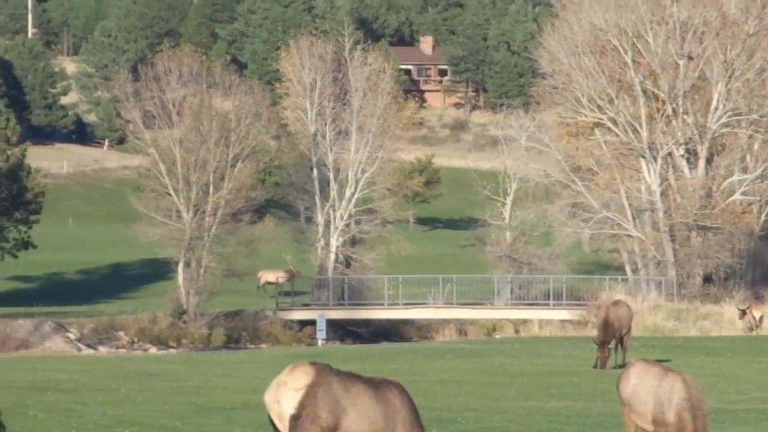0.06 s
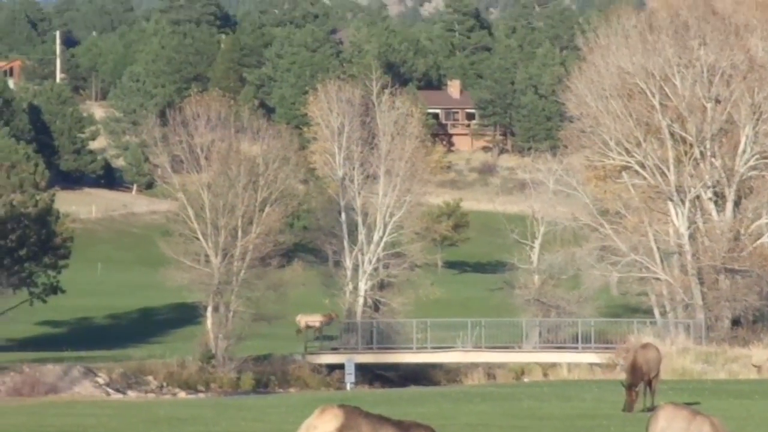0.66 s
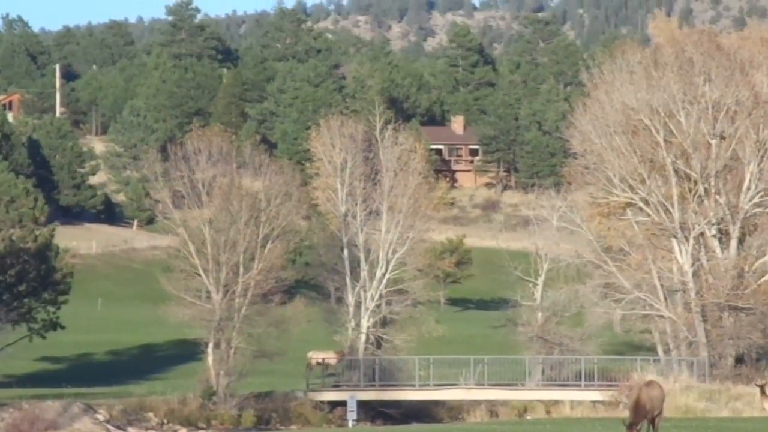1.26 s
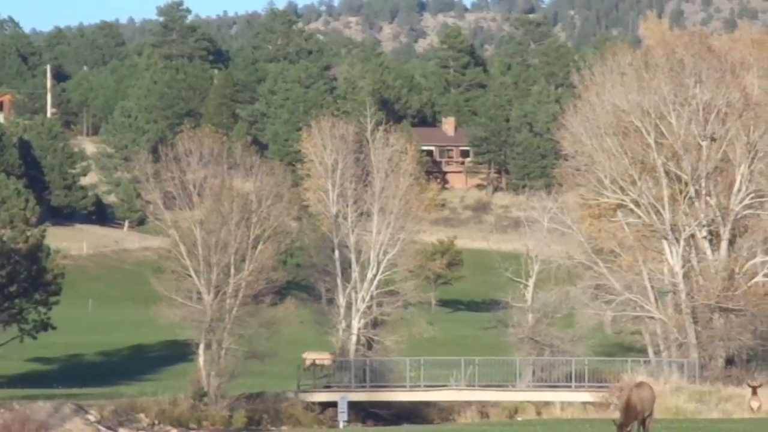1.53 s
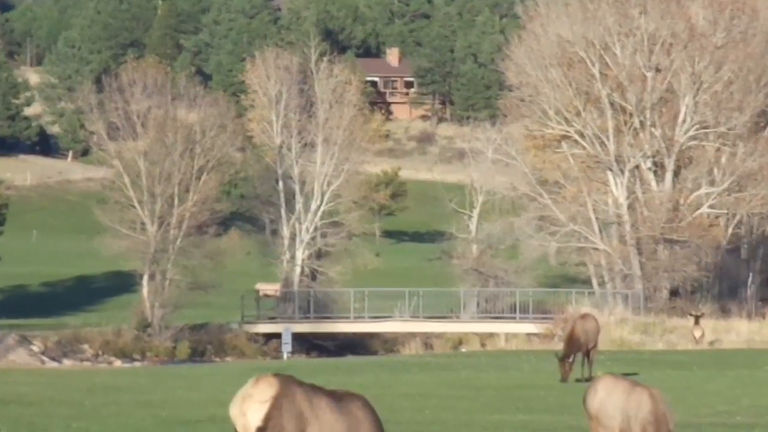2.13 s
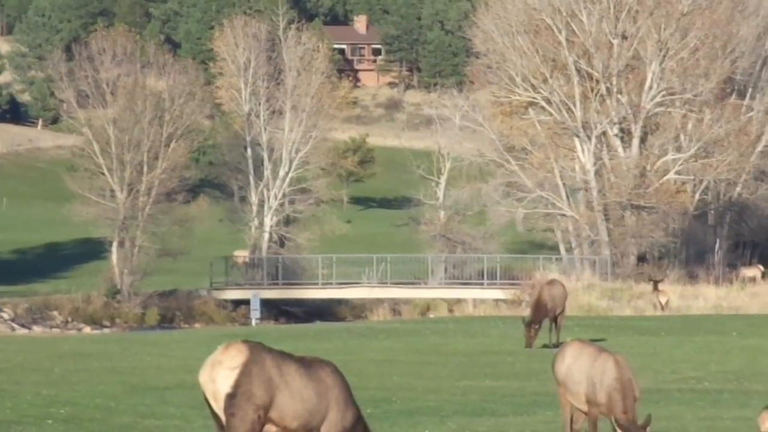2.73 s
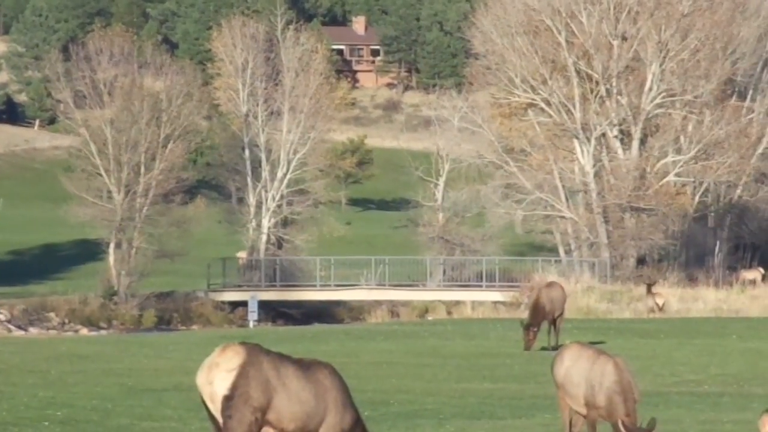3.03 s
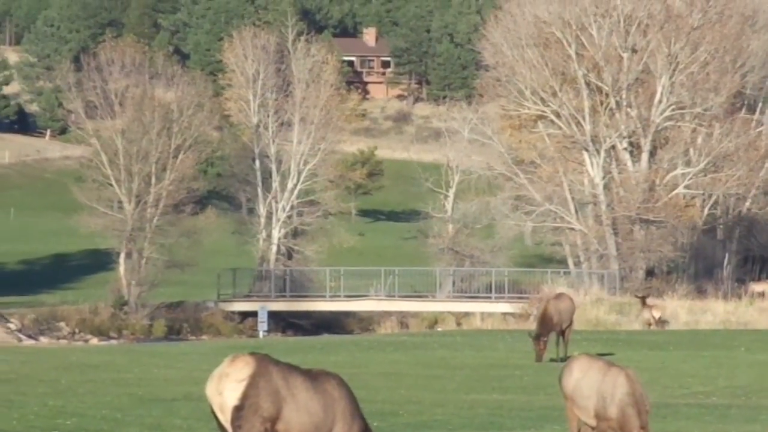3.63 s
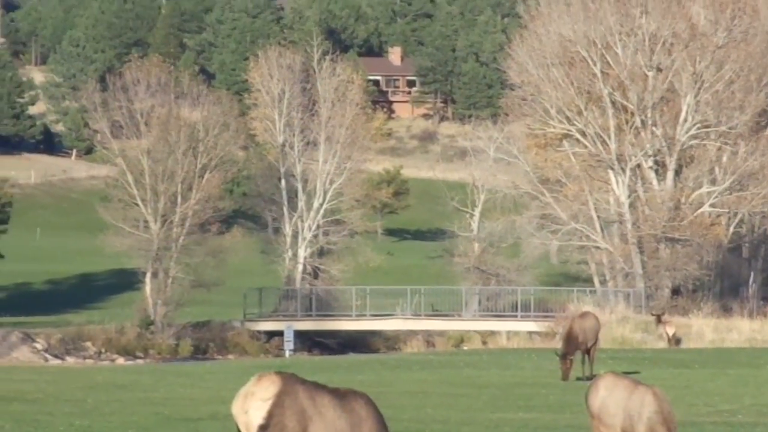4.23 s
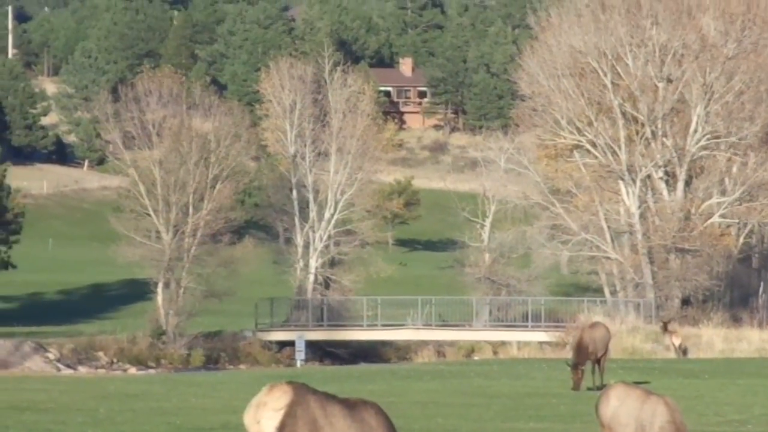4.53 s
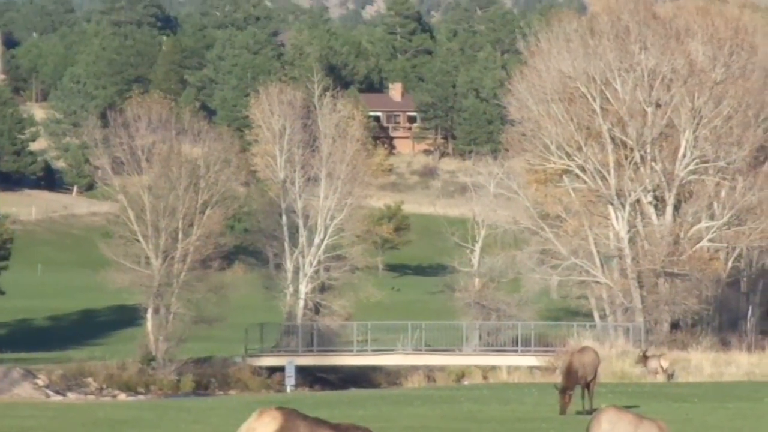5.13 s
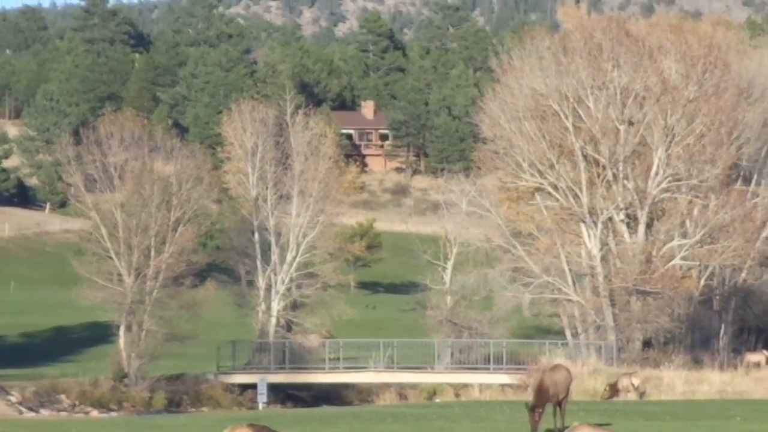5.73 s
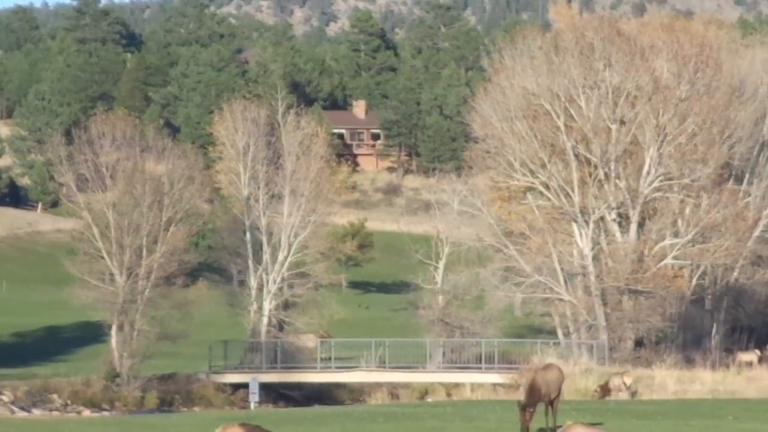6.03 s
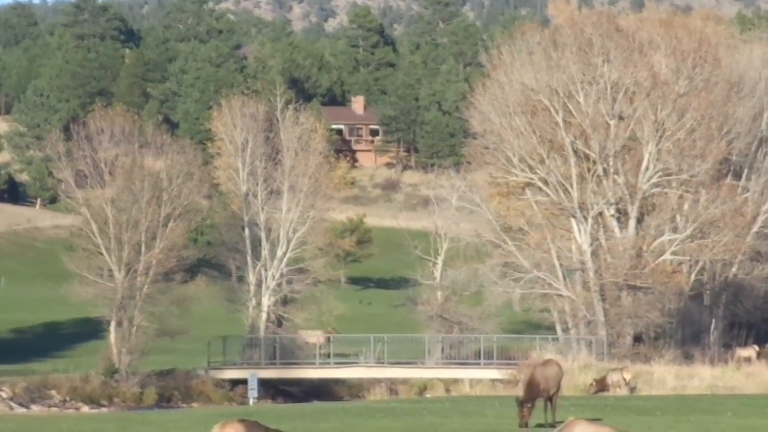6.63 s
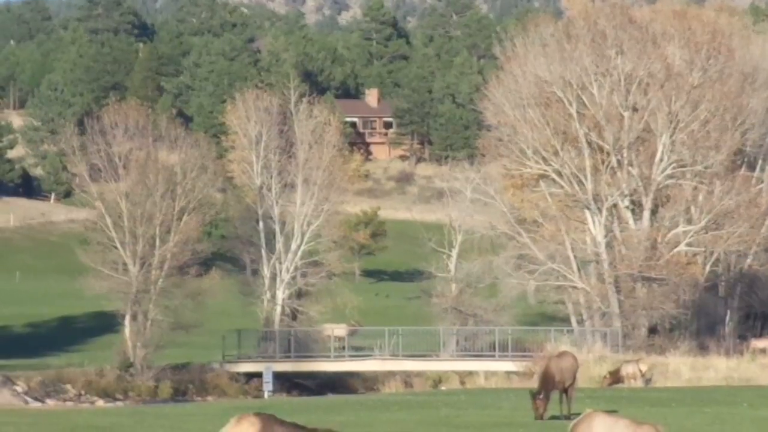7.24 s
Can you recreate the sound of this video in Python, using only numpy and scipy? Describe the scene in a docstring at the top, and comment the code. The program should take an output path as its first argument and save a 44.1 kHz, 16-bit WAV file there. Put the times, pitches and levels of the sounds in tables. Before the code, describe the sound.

Gusty wind blows across the bare microphone of a hand-held camera in an open meadow, making a close, fluttering rumble with dull thumps. The hardest gusts overload it with brief cracks and fizz. A short lull near the middle reveals a faint valley rush, distant birds and a light finger rub. Then the strongest gusts hit, followed by weaker ones to the end.

```python
"""An open meadow, gusty wind on the bare microphone of a hand-held camera, a valley rushing far off.
From the start eddies sweep the port in a fluttering rumble that rises in pitch with the wind speed;
strong ones thump, and from 0.7 s the hardest overload the microphone, crack and fizz. Dull low thumps,
mostly from large slow eddies, first come at 2.4 s. A lull near 3 s bares distant birds, a finger rub and
the camera's hiss. Hard gusts crack again from 3.6 s to 4.9 s, then weaker ones blow on to the end."""
import sys
import numpy as np
from scipy import signal
from scipy.fft import rfft, irfft
from scipy.io import wavfile
from scipy.ndimage import uniform_filter1d, map_coordinates

SR = 44100
rng = np.random.default_rng(int(sys.argv[2]) if len(sys.argv) > 2 else 0)


def wrap_up_sound(samples):
    """Save the sound to the file named by the first command line argument, as 16-bit audio."""
    columns = np.atleast_2d(samples).T
    # keep every value between -1 and 1, then stretch to whole-number steps
    tamed = np.clip(columns, -1, 1)
    steps = np.round(tamed * 32767).astype(np.int16)
    wavfile.write(sys.argv[1], SR, steps)


N = 325458
TIME = np.arange(N) / SR
REFERENCE_DB, REFERENCE_HZ = -30, 350.9   # wind level and nominal eddy pitch that give speed 1

# far rush of the valley: (frequency [Hz], spectral level [dB])
VALLEY_SPECTRUM = [(20, 7), (100, -10), (250, -18.5), (450, -3.5), (700, 3.5), (930, 6), (1300, -4),
                   (1650, -7), (2100, -15), (3200, -22.5), (6000, -30.5), (15000, -46.5)]
# gusts reaching the microphone port: (start [s], length [s], wind level [dB])
GUSTS = [(0.015, .2, -32.5), (0.26, 0.27, -37.5), (0.523, 0.27, -27.5), (0.844, .03, -28),
         (0.992, 0.079, -29), (1.089, 0.068, -32), (1.213, .16, -28), (1.411, 0.12, -45),
         (1.619, 0.092, -48), (1.82, 0.064, -37), (1.919, 0.29, -27.5), (2.251, .055, -29),
         (2.357, 0.041, -24), (2.448, 0.099, -28), (2.643, 0.095, -29), (2.775, .23, -29.5),
         (3.015, 0.14, -51.5), (3.553, 0.18, -26), (3.783, .255, -35), (4.074, .185, -30.5),
         (4.323, 0.13, -24), (4.458, .3, -42.5), (4.796, 0.21, -35), (5.091, 0.036, -30),
         (5.163, .2, -42.5), (5.378, 0.24, -30.5), (5.66, 0.22, -32), (5.904, 0.51, -42), (6.61, 0.1, -37),
         (6.781, 0.47, -35.5), (7.276, 0.19, -45)]
# pressure of the large eddies at speed 1: (frequency [Hz], spectral level [dB])
LARGE_EDDY_SPECTRUM = [(20, -22.5), (60, -17), (130, -2.5), (260, 3.5), (420, 1), (600, -4), (800, -22.5),
                       (1200, -41.5)]
# pressure of the fine eddies at speed 1: (frequency [Hz], spectral level [dB])
FINE_EDDY_SPECTRUM = [(350, -35.5), (550, -4.5), (720, 4.5), (950, -6), (1350, -22), (1900, -40),
                      (2600, -41), (4500, -70.5)]
# single strong eddies: (time [s], relative level [dB], nominal pitch [Hz], nominal length [s])
BUFFETS = [(0.1, -24.5, 359.2, 0.023), (0.171, -19.5, 377.7, 0.01), (0.252, -21.5, 369, 0.0091),
           (0.544, -18, 392.1, 0.015), (0.571, -18.5, 400.5, 0.0071), (0.638, -17, 357.6, 0.004),
           (0.691, -18, 519, 0.012), (0.707, -12.5, 488.5, 0.01), (0.724, -17.5, 805.5, 0.0084),
           (0.758, -15.5, 418, 0.019), (0.783, -15.5, 342, 0.0038), (0.843, -17.5, 504, 0.0076),
           (0.918, -20, 559.7, 0.0023), (0.944, -23.5, 555.8, 0.024), (1.02, -17, 462.4, 0.013),
           (1.038, -18, 418.6, 0.0053), (1.099, -18, 392.2, 0.0081), (1.261, -16.5, 373.5, .01),
           (1.328, -12.5, 537, 0.019), (1.348, -14, 507, 0.0092), (1.361, -12.5, 547, 0.0053),
           (1.372, -14.5, 449, 0.0082), (1.468, -23, 249, 0.011), (1.589, -26, 410.5, 0.0095),
           (1.917, -16.5, 390.4, 0.011), (1.967, -15.5, 487.4, 0.0048), (1.985, -16, 458.5, 0.0082),
           (2.012, -17.5, 391.7, 0.0063), (2.103, -15, 484, 0.0068), (2.12, -14.5, 323, 0.0078),
           (2.149, -14, 322.1, 0.0038), (2.279, -15, 330.5, 0.0091), (2.357, -14.5, 239, 0.008),
           (2.386, -12.5, 478, 0.0082), (2.477, -11.5, 488.2, 0.011), (2.495, -15.5, 451.8, 0.016),
           (2.534, -15.5, 470.3, 0.0024), (2.611, -14, 469.5, 0.0081), (2.656, -15, 470, 0.0096),
           (2.715, -17, 422, 0.0074), (2.856, -16, 321, 0.0066), (2.874, -17, 418.4, 0.0059),
           (2.907, -13.5, 589.7, 0.0065), (2.936, -14.5, 368.4, 0.0099), (2.96, -16.5, 385.3, 0.0084),
           (3.555, -17, 280.4, 0.0049), (3.571, -11.5, 388.2, 0.0058), (3.602, -12.5, 630.4, 0.0086),
           (3.65, -16, 641, 0.018), (3.668, -12.5, 550.5, .014), (3.686, -12.5, 528.2, .011),
           (3.705, -13.5, 519.9, 0.02), (3.765, -6.5, 394, 0.0046), (3.87, -23, 600.6, 0.0061),
           (3.898, -22, 451, 0.009), (3.965, -16.5, 488.4, 0.0052), (4.011, -20, 499.2, 0.0088),
           (4.027, -19.5, 464.4, 0.0093), (4.082, -14.5, 488.7, 0.018), (4.108, -10, 340.7, 0.0098),
           (4.126, -7, 533, 0.0033), (4.149, -21.5, 450.7, 0.013), (4.225, -19, 402.2, 0.017),
           (4.329, -12.5, 359.3, 0.0059), (4.342, -10, 561, 0.0066), (4.356, -11, 476.3, 0.0094),
           (4.368, -13, 539.3, 0.0086), (4.437, -30, 303.3, 0.0054), (4.552, -21.5, 305.4, 0.017),
           (4.633, -26, 290.4, 0.0061), (4.804, -23, 348, 0.006), (4.837, -22, 398, 0.012),
           (4.905, -15, 501.2, 0.0048), (5.112, -14.5, 530.3, 0.0065), (5.132, -16, 369.5, 0.0064),
           (5.267, -21.5, 249.8, 0.0055), (5.315, -19.5, 377.9, .005), (5.541, -18.5, 278.9, .007),
           (5.587, -14, 259.7, 0.0069), (5.642, -17, 341.7, 0.0058), (5.707, -19, 349.8, .005),
           (5.89, -23, 379.3, 0.0064), (6.127, -25, 270.3, 0.0081), (6.182, -27, 241, 0.0092),
           (6.272, -28.5, 271.6, 0.0085), (6.398, -33.5, 251.8, 0.0052), (6.614, -20, 290, 0.0072),
           (6.701, -23.5, 450, 0.0052), (6.753, -19.5, 240.2, .005), (6.776, -16, 289.4, 0.0064),
           (6.808, -18.5, 396.3, .011), (6.862, -16, 492.1, .008), (6.948, -20.5, 430.6, 0.0094),
           (6.987, -17, 471.8, 0.0052), (7.055, -22, 431, 0.011), (7.13, -21, 439.2, 0.0049),
           (7.211, -19.5, 430, .006)]
# diaphragm cracks in the hardest gusts: (time [s], relative peak [dB], treble cutoff [Hz])
CRACKS = [(0.7062, -30, 1500), (0.7179, -9.5, 1680), (0.7576, -40, 3000), (1.3265, -29, 1440),
          (1.3491, -34.5, 4406), (1.36, -28, 2903), (2.1469, -25, 1530), (2.3567, -30.5, 1500),
          (2.3694, -26, 3250), (2.477, -33, 2900), (2.9082, -36, 1600), (3.5701, -25.5, 1496),
          (3.6056, -17, 9670), (3.664, -20, 1500), (3.6714, -12.5, 1500), (3.698, -16, 1500),
          (3.7041, -24, 2900), (3.7634, -18, 11880), (4.1083, -18.5, 10980), (4.1224, -13.5, 1751),
          (4.1881, -41, 7300), (4.2199, -31.5, 6797), (4.2527, -34, 6450), (4.3279, -23, 2480),
          (4.3463, -14, 1506), (4.3556, -24, 3000), (4.3877, -41, 6300), (4.4193, -38, 7260),
          (4.9035, -19, 1700)]
# gritty fizz of the overloaded microphone: (time [s], level [dB], width [s])
FIZZES = [(0.734, -64, 0.026), (1.355, -68, 0.02), (2.367, -68, 0.011), (3.69, -56, 0.016),
          (4.198, -67, 0.035), (4.358, -59.5, .018)]
# dull low thumps, mostly from large slow wind eddies: (time [s], level [dB])
THUMPS = [(2.367, -24), (2.608, -30.5), (3.144, -38), (4.392, -23), (4.434, -17.5), (4.539, -27),
          (6.007, -31), (6.058, -32.5), (6.175, -27.5)]
# tone of a low thump: (frequency [Hz], spectral level [dB])
THUMP_SPECTRUM = [(30, -19), (90, 3.5), (150, 17), (230, -14.5), (400, -17), (900, -62)]
# birds far across the meadow: (time [s], level [dB], pitch [Hz], width [s])
BIRD_CALLS = [(2.974, -59, 1641, 0.028), (3.061, -70, 2353, 0.017), (5.33, -62.5, 1852, 0.029)]
# fingers shifting on the camera body: (time [s], level [dB], width [s])
RUBS = [(3.278, -66, 0.0045), (4.484, -64.5, .012), (5.189, -69.5, 0.0065)]
# tone of a finger rub: (frequency [Hz], spectral level [dB])
RUB_SPECTRUM = [(1500, -4), (3000, 2), (6500, -5), (9000, -8), (15000, -25)]


def from_db(db):
    """Decibels to gain."""
    return 10 ** (np.asarray(db) / 20)


def rms_one(x):
    """Scale to unit power."""
    return x / np.sqrt(np.mean(x ** 2) + 1e-20)


def smooth(x, seconds):
    """Triangular moving average."""
    size = max(int(seconds * SR), 1)
    return uniform_filter1d(uniform_filter1d(x, size), size)


def evened(x, seconds):
    """Hold the power near one over the given time."""
    return x / np.sqrt(np.abs(smooth(x ** 2, seconds)) + 1e-6)


def drift(rate):
    """Random wander of spread 1 that changes about rate times a second."""
    return rms_one(smooth(rng.standard_normal(2 * N), .5 / rate)[N // 2:N // 2 + N])


def noise(spectrum, size=N):
    """Noise of unit power with the given spectrum."""
    hz, level_db = np.transpose(spectrum)
    bin_hz = np.maximum(np.arange(size // 2 + 1) * SR / size, 1)
    gain = from_db(np.interp(np.log(bin_hz), np.log(hz), level_db, right=-200))
    return rms_one(irfft(rfft(rng.standard_normal(size)) * gain, size))


def butter(x, hz, kind):
    """Causal second-order low- or high-pass."""
    return signal.sosfilt(signal.butter(2, hz, kind, fs=SR, output="sos"), x)


def bell(at, width):
    """Gaussian swell of height 1; width is its standard deviation in seconds."""
    out = np.zeros(N)
    near = slice(max(int((at - 5 * width) * SR), 0), int((at + 5 * width) * SR))
    out[near] = np.exp(-.5 * ((TIME[near] - at) / width) ** 2)
    return out


def valley_rush(level_db=-55, waver_db=1.02):
    """The valley rushes in the distance, its level wavering slightly."""
    return from_db(level_db + waver_db * drift(4.6)) * noise(VALLEY_SPECTRUM)


def camera_noise(hiss_db=-71, whine_db=-88.5, whine_hz=12265):
    """The camera's own white hiss and faint, unsteady whine."""
    whine = np.sin(2 * np.pi * np.cumsum(whine_hz + 15 * drift(20)) / SR)
    return from_db(hiss_db) * rng.standard_normal(N) + from_db(whine_db) * whine


def wind_level(calm_db=-61, rise_db_per_s=1101, sag_db_per_s=9, fall_db_per_s=1001.5):
    """Wind at the port in dB: each gust rises, sags and collapses; the strongest prevails."""
    wind_db = np.full(N, float(calm_db))
    for start, length, db in GUSTS:
        age = TIME - start
        early, late = np.maximum(-age, 0), np.maximum(age - length, 0)
        gust_db = db - rise_db_per_s * early - sag_db_per_s * age - fall_db_per_s * late
        wind_db = np.maximum(wind_db, gust_db)
    return wind_db


def rumble(wind_db, level_db=-47, follow=0.49, bottom_hz=36, top_hz=120):
    """Large slow eddies around the camera body follow the gusts only loosely."""
    bass = butter(butter(rng.standard_normal(N), top_hz, "low"), bottom_hz, "high")
    swell_db = follow * (smooth(wind_db, 0.083) - REFERENCE_DB)
    return from_db(level_db + swell_db) * rms_one(bass)


def swept_eddies(speed, fine_db, even_s):
    """A frozen pattern of eddies is carried past the port: the faster, the higher it sounds."""
    travelled = np.cumsum(np.clip(speed, .2, 2.5))
    large, fine = (map_coordinates(noise(spectrum, size=2 * N), [travelled], order=3, mode="wrap")
                   for spectrum in (LARGE_EDDY_SPECTRUM, FINE_EDDY_SPECTRUM))
    return evened(large, even_s) + from_db(fine_db) * speed * evened(fine, even_s)


def shedding(wind_db, eddies_per_s=34, jitter=.8):
    """In weak wind the housing sheds eddies one by one, unevenly; a level swing in dB."""
    rate = eddies_per_s * np.exp(jitter * drift(70))
    swing_db = np.clip(1 + .3 * (REFERENCE_DB - wind_db), 0, 6)
    return swing_db * np.sin(2 * np.pi * np.cumsum(rate) / SR)


def slack(lead_s=0.01238, width_s=.005, drop_db=7):
    """The flow slackens for an instant before each strong eddy; a dip in dB."""
    return -drop_db * np.minimum(sum(bell(at - lead_s, width_s) for at, *_ in BUFFETS), 1)


def flutter(wind_db, gain_db=2.08, lumps_per_s=110):
    """Wind running over the bare port breaks into lumps; each is both louder and brighter."""
    lumps = from_db(shedding(wind_db) + 4.5 * drift(lumps_per_s))
    strength = from_db(wind_db + slack()) * evened(lumps, seconds=.02)
    speed = (strength / from_db(REFERENCE_DB)) ** .2
    return from_db(gain_db) * strength * swept_eddies(speed, fine_db=-14, even_s=0.035)


def buffets(gain_db=-2.0, width_share=0.34):
    """Each strong eddy hits the port as a burst of a few pressure swings at its own pitch."""
    times, _, pitches, _ = np.transpose(BUFFETS)
    strength = sum(from_db(db) * bell(at, length * width_share) for at, db, _, length in BUFFETS)
    speed = (np.interp(TIME, times, pitches) / REFERENCE_HZ) ** .7
    return from_db(gain_db) * strength * swept_eddies(speed, fine_db=-15, even_s=0.004)


def overload(pressure, ceiling=.285, knee=7.9, dull_hz=2400):
    """The microphone flattens the tallest swings, with rounded corners."""
    flattened = pressure / (1 + np.abs(pressure / ceiling) ** knee) ** (1 / knee)
    return signal.sosfiltfilt(signal.butter(3, dull_hz, fs=SR, output="sos"), flattened)


def cracks(gain_db=-4.0, bottom_hz=600, spit_db=-25, spit_decay_s=0.0017, grit_db=5):
    """The diaphragm snaps at its limit: one steep pressure spike, then a gritty dying spit of air."""
    out = np.zeros(N)
    size = 2000   # samples per crack
    for at, db, cutoff_hz in CRACKS:
        grains = rms_one(rng.standard_normal(size) * from_db(grit_db * rng.standard_normal(size)))
        spit = from_db(spit_db) * grains * np.exp(-TIME[:size] / spit_decay_s)
        spike = butter(signal.unit_impulse(size) + spit, cutoff_hz, "low")
        start = int(at * SR)
        out[start:start + size] += from_db(db) * spike / spike.max() * rng.choice([-1, 1])
    return from_db(gain_db) * butter(out, bottom_hz, "high")


def fizz(ticks_per_s=600, uneven_db=5, bottom_hz=2000, top_hz=3600):
    """Dense random ticks of uneven size fizz around the microphone's hardest overloads."""
    ticks = (rng.random(N) < ticks_per_s / SR) * rng.choice([-1, 1], N)
    ticks = ticks * from_db(uneven_db * rng.standard_normal(N))
    grit = rms_one(butter(butter(ticks + 1e-18, bottom_hz, "high"), top_hz, "low"))
    return grit * sum(from_db(db) * bell(at, width) for at, db, width in FIZZES)


def low_thumps(width_s=0.0044):
    """Dull low thumps right at the microphone, mostly from large slow wind eddies."""
    thud = evened(noise(THUMP_SPECTRUM), seconds=0.0031)
    return thud * sum(from_db(db) * bell(at, width_s) for at, db in THUMPS)


def distant_birds(waver=0.0132):
    """Thin whistles from far across the meadow, blurred by a quick waver in pitch."""
    phase_per_hz = 2 * np.pi * np.cumsum(1 + waver * drift(60)) / SR
    return sum(from_db(db) * bell(at, width) * np.sin(hz * phase_per_hz)
               for at, db, hz, width in BIRD_CALLS)


def finger_rubs():
    """Fingers shift on the camera body, close to the microphone, in brief light scuffs."""
    return noise(RUB_SPECTRUM) * sum(from_db(db) * bell(at, width) for at, db, width in RUBS)


def scene():
    """One microphone: wind and finger rubs up close, the quiet meadow behind."""
    wind_db = wind_level()
    pressure = flutter(wind_db) + buffets() + rumble(wind_db)
    close = overload(pressure) + cracks() + fizz() + finger_rubs() + low_thumps()
    return (close + distant_birds() + valley_rush() + camera_noise())[None]


def record(dry, low_cut_hz=42, high_cut_hz=15100):
    """The camera thins the deepest bass and cuts the top steeply."""
    thinned = butter(dry, low_cut_hz, "high")
    return signal.sosfilt(signal.ellip(10, .1, 70, high_cut_hz, fs=SR, output="sos"), thinned)


dry = scene()
out = record(dry)
wrap_up_sound(out)
```